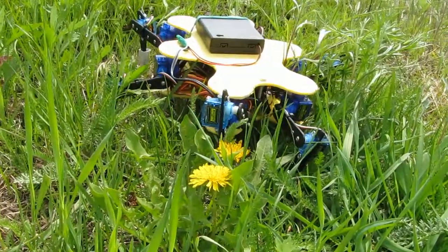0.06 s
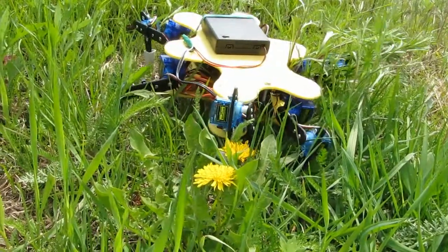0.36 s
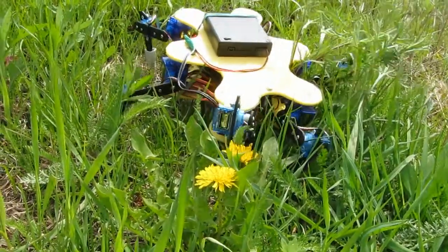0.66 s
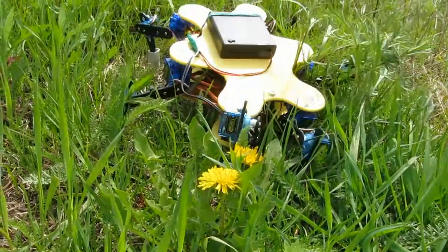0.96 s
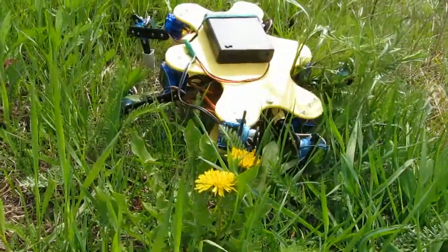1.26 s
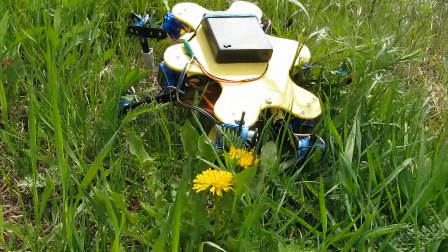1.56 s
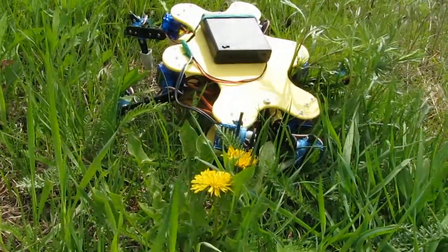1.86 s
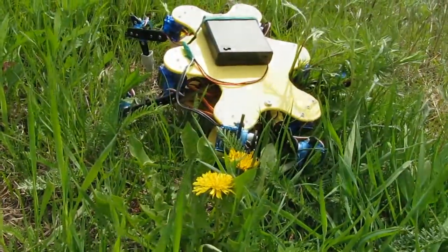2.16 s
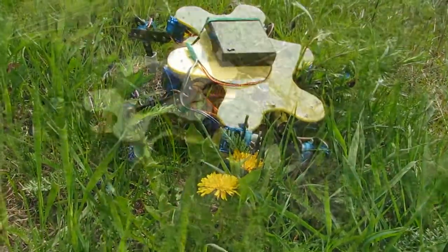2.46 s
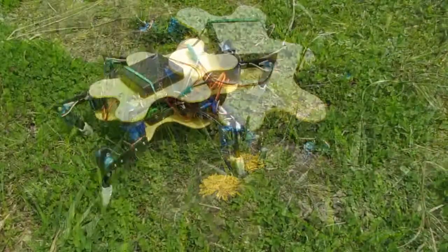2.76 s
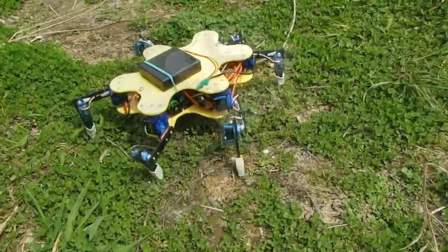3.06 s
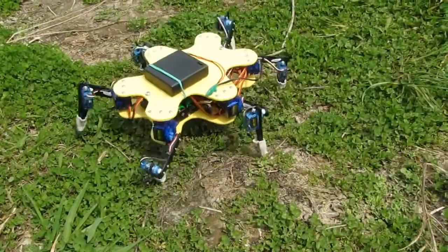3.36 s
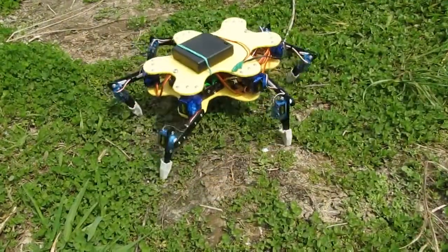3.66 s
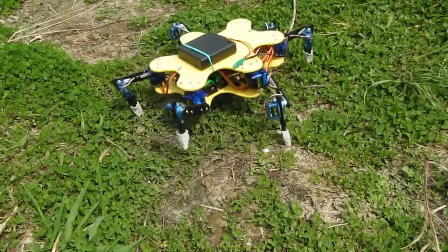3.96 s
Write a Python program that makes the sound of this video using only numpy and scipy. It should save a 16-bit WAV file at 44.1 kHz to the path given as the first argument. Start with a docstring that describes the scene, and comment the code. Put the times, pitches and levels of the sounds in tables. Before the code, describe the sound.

A small walking robot rustles in grass close by, with sharp plastic snaps at the start, at 0.6 seconds and around 1 to 1.2. Wind buffets the microphone from 0.2 until about 3.2 seconds. At 2.1 seconds the servos suddenly start a hissing whirr that swells with each stride to the end, with brief foot scuffs and loud snaps at 2.5 and 3.5 seconds, over soft outdoor hiss.

```python
"""Outdoors on grass, a camera's stereo microphone close to a small six-legged robot.
First the legs rustle through long blades and snap sharply against the plastic frame, while wind
starts to buffet the microphone, mostly the right port. At 2.1 s the servos start all at once,
a hissing whirr of tiny gears that swells with every stride. Just after 3 s the wind drops away
and the robot walks on over a soft background hiss."""
import sys
import numpy as np
from scipy import signal
from scipy.fft import rfft, irfft, next_fast_len
from scipy.io import wavfile
from scipy.ndimage import uniform_filter1d, map_coordinates

SR = 44100
rng = np.random.default_rng(int(sys.argv[2]) if len(sys.argv) > 2 else 0)


def transcribe(signal):
    """Save signal, clipped to [-1, 1], as a 16-bit WAV file at the path in sys.argv[1]."""
    frames = np.atleast_2d(signal).T
    limited = np.clip(frames, -1, 1)
    pcm = np.round(limited * 32767).astype(np.int16)
    wavfile.write(sys.argv[1], SR, pcm)


N = 176400

# Servo strokes, close up: t/s at top speed, length/s, relative hiss level/dB, relative rasp level/dB
STROKES = [(2.149, 0.091, -30, -39), (2.285, .14, -25.5, -35), (2.493, 0.11, -26.5, -36),
           (2.602, .08, -37, -48), (2.804, 0.15, -28, -37.5), (3.023, 0.099, -25, -32.5),
           (3.095, 0.057, -30, -36), (3.287, 0.18, -27.5, -39), (3.484, .05, -28, -37.5),
           (3.551, 0.098, -36, -51), (3.775, .14, -29.5, -40.5), (3.868, 0.052, -30, -38.5),
           (3.995, 0.098, -27, -33)]
# Colour of the gear hiss and of the lower gearbox rasp: f/Hz, level/dB
HISS_SPECTRUM = [(500, -66), (3000, -21.5), (4200, -8.5), (5800, -4), (6750, -3), (7300, 1.5), (7900, -5),
                 (10000, -8), (14200, -11), (16000, -21)]
RASP_SPECTRUM = [(300, -24), (1700, -11), (2050, 1.5), (2380, -5), (2650, 4.5), (2950, -5), (3380, 2.5),
                 (3800, -4), (4200, -3), (4900, -16), (6500, -45)]
# The robot's stereo image at the microphone: f/Hz, left-right likeness (0-1)
ROBOT_LIKENESS = [(1000, 1), (5000, 0.64), (8000, 0.58), (14000, 0.1)]
SERVO_START_S, SERVO_ATTACK_S = 2.109, 0.00079
HISS_GAIN_DB, RASP_GAIN_DB, HISS_FLOOR_DB, RASP_FLOOR_DB = 1, 2, -44, -51
TEETH_PER_S, TEETH_PER_S_PER_DB, FULL_EFFORT_DB = 275, 5, -26  # teeth click faster as the effort rises
# Motor whines as a leg turns back: centre t/s, length/s, level/dB, f/Hz
WHINES = [(2.708, 0.034, -35, 8720), (3.123, 0.073, -39, 10000), (3.623, .025, -38, 8700)]
# Tones of the powered servos: f/Hz, level/dB relative to the background hiss, waver (share of f)
IDLE_TONES = [(1390, -15, .028), (2617, -15, .004)]
# Ticking of the loaded servos: t/s, level/dB
TWITCH_LEVEL = [(.08, -67), (.14, -48), (.3, -48.5), (.36, -59), (.53, -55), (.68, -59), (.9, -86)]

# Legs snapping on the frame: t/s, crack level/dB, ring level/dB, crack f/Hz
SNAPS = [(.0069, -5, -26.5, 6980), (.048, -34, -47, 6800), (0.6037, -9.5, -25, 7280),
         (0.9644, -16, -20, 6400), (1.016, -39, -40, 7600), (1.1043, -18.5, -17.5, 6440),
         (1.2337, -11, -18.5, 6450), (1.266, -35, -33, 6600), (2.55, 0.5, -41, 7890),
         (3.5013, -1.5, -32, 8360)]
# Colour of a crack: multiple of its f, level/dB
CRACK_SPECTRUM = [(.06, -32), (.4, -9), (.6, -12), (.95, -1), (1.3, -4), (1.65, -1.5), (2.3, -12)]
# Modes of the plastic frame: f/Hz, level/dB, t60/s
FRAME_MODES = [(1040, 0, .017), (1500, -5, .02), (2110, -3, .017), (2520, 0, .013), (2800, -9, .01),
               (6250, -2, .007)]
CRACK_T60_S, PING_T60_S, PING_DB, SCATTER_T60_S, SCATTER_DB = 0.0033, 0.0023, 7, 0.03, -19.5
# Feet scuffing the turf: centre t/s, length/s, level/dB, f/Hz
SCUFFS = [(0.037, 0.017, -38, 7200), (0.627, 0.025, -42.5, 7500), (1.12, 0.06, -40, 6350),
          (2.116, 0.01, -25, 6960), (2.365, 0.063, -30, 6500), (2.709, 0.029, -31, 7900),
          (3.142, 0.095, -31, 8000), (3.41, 0.18, -34.5, 6700), (3.623, 0.048, -34, 7700)]
# Colour of a scuff: multiple of its f, level/dB
SCUFF_SPECTRUM = [(.2, -18.5), (.55, -8.5), (.9, -3.5), (1.1, -4), (1.6, -14), (2.2, -35)]
# Legs brushing the grass: t/s, level/dB
GRASS_LEVEL = [(0, -44), (.08, -49), (.3, -43.5), (.5, -43.5), (.62, -49), (.69, -53.5), (.85, -50),
               (1.0, -40.5), (1.2, -44.5), (1.26, -37), (1.3, -49.5), (2.1, -56)]
# Colour of the blades: f/Hz, level/dB
GRASS_SPECTRUM = [(500, -1.5), (1500, -6), (3500, 1), (5000, -4), (6500, -3.5), (9000, -9.5),
                  (11000, -15.5), (16000, -22)]

# Gusts on the microphone, and the breeze between them: start t/s, length/s, relative level/dB
GUSTS = [(.239, 0.035, -17), (.3, 0.055, -25.5), (.468, 0.079, -8), (.565, 0.039, -14), (.625, 0.059, -8),
         (.69, 0.081, -15), (.845, 0.13, -18), (.988, 0.081, -14), (1.08, 0.16, -20.5), (1.245, 0.017, -12),
         (1.27, 0.17, -26.5), (1.495, 0.061, -20.5), (1.668, 0.058, -17), (1.75, .055, -26.5),
         (1.95, 0.066, -14), (2.02, 0.074, -12), (2.11, 0.043, -18), (2.365, 0.077, -14.5),
         (2.46, 0.072, -19.5), (2.595, .04, -29), (2.745, 0.051, -26), (2.88, 0.22, -28.5),
         (3.158, 0.013, -17)]
BREEZE = (0.198, 2.95, -34.5)
# Wind direction: t/s, level/dB at the left port relative to the right
WIND_SIDE = [(.49, -17), (.54, -2), (.68, -6), (1.0, -16), (1.85, -15), (1.98, -27), (2.12, -9),
             (2.42, -22), (2.65, -12)]
# Colour of the low eddies and the higher flutter at the ports: f/Hz, level/dB
EDDY_SPECTRUM = [(15, -8.5), (38, -0.5), (70, 0.5), (125, -4), (400, -34), (1200, -100)]
FLUTTER_SPECTRUM = [(60, -31), (140, 5), (250, 1), (400, -16), (1400, -37.5), (4000, -80)]
GUST_EDGE_S, STRONG_GUST_DB, EDDY_DB, FLUTTER_DB, FLUTTER_EXPONENT = 0.0051, -11.5, 1.5, -8.5, 1.61
# Colour of the background hiss and of the low outdoor rumble: f/Hz, level/dB
BACKGROUND_SPECTRUM = [(20, -5), (80, 11.5), (280, 4), (460, -0.5), (1200, 4), (1480, 5.5), (1700, -.5),
                       (2600, 3), (3700, 5), (4400, -3), (9000, -10.5), (16000, -17.5)]
RUMBLE_SPECTRUM = [(30, -16), (41, 1), (49, -18.5), (100, -18), (250, -76)]
# Background hiss, rising and falling with the camera's gain: t/s, level/dB
BACKGROUND_LEVEL = [(0, -55), (1.1, -54), (1.6, -46.5), (3.15, -41), (3.3, -48)]
# Low outdoor rumble: t/s, level/dB
RUMBLE_LEVEL = [(0, -42.5), (3.35, -41.5), (3.55, -60.5), (4, -50)]


def servos():
    """Close up, gear teeth click through the servo cases, faster and louder in mid-stroke."""
    hiss_power = sum((amp(db) * swell(s, length)) ** 2 for s, length, db, _ in STROKES)
    rasp_power = sum((amp(db) * swell(s, length)) ** 2 for s, length, _, db in STROKES)
    hiss_gain = np.sqrt(amp(HISS_FLOOR_DB) ** 2 + hiss_power)
    rasp_gain = np.sqrt(amp(RASP_FLOOR_DB) ** 2 + rasp_power)
    effort_db = 20 * np.log10(hiss_gain) - FULL_EFFORT_DB
    tooth_rate = np.maximum(TEETH_PER_S + TEETH_PER_S_PER_DB * effort_db, 20)
    teeth = chatter(tooth_rate, jitter=.09, life_s=.00045, spread_db=1.9, share=.62)
    hiss = amp(HISS_GAIN_DB) * hiss_gain * servo_cases(rush(HISS_SPECTRUM, ROBOT_LIKENESS))
    rasp = amp(RASP_GAIN_DB) * rasp_gain * servo_cases(rush(RASP_SPECTRUM, ROBOT_LIKENESS))
    running = np.clip((np.arange(N) / SR - SERVO_START_S) / SERVO_ATTACK_S, 0, 1)
    pan = amp([[.25], [-.25]])  # a touch left of centre
    return running * teeth * (hiss + rasp) * pan


def servo_cases(x, ripple_db=2.5):
    """Different cases ring as the legs turn: narrow resonances that shift at random."""
    spectra = signal.stft(x, nperseg=512)[2]
    ripple = uniform_filter1d(rng.standard_normal(spectra.shape[1:]), size=3, axis=0)  # over frequency
    ripple = uniform_filter1d(ripple, size=16, axis=1)  # over time
    coloured = signal.istft(spectra * amp(ripple_db * unit(ripple)), nperseg=512)[1]
    return unit(coloured[:, :N])


def motor_whines():
    """Thin motor tones: faint ones throughout, and a short high one where a leg turns back."""
    background_db = curve(BACKGROUND_LEVEL)
    idle = sum(amp(background_db + db) * tone(hz, waver) for hz, db, waver in IDLE_TONES)
    return idle + sum(amp(db) * swell(s, length) * tone(hz, waver=.016) for s, length, db, hz in WHINES)


def servo_twitches():
    """Servos holding against the grass tick faintly, once per control pulse."""
    ticks = chatter(per_s=50, jitter=.04, life_s=.00033, spread_db=5.5, share=1)
    return amp(curve(TWITCH_LEVEL)) * ticks * rush(HISS_SPECTRUM, ROBOT_LIKENESS)


def leg_snaps():
    """A leg hits the frame: a crack with a brief ping, a dull ring and faint scatter off the ground."""
    out = np.zeros((2, N + SR))
    t = np.arange(SR // 10) / SR
    rise = 1 - np.exp(-t / .00008)
    envelope = decay(t, CRACK_T60_S) + amp(SCATTER_DB) * decay(t, SCATTER_T60_S)
    for s, crack_db, ring_db, hz in SNAPS:
        at = round(s * SR)
        noise = pitched_rush(CRACK_SPECTRUM, hz)[:, :len(t)]
        crack = unit(noise * envelope) * np.sqrt(np.mean(envelope ** 2))
        ping = amp(PING_DB) * np.sin(2 * np.pi * hz * t) * decay(t, PING_T60_S)
        out[:, at:at + len(t)] += rise * (amp(crack_db) * (crack + ping) + amp(ring_db) * frame_ring(t))
    return out[:, :N]


def frame_ring(t, spread_db=1.8, detune=.02):
    """Each snap lands on a different part of the plastic frame, so its modes vary in level and pitch."""
    ring = np.zeros(len(t))
    for k, (hz, db, t60) in enumerate(FRAME_MODES):
        gain = (-1) ** (k + 1) * amp(db + rng.normal(0, spread_db))
        ring += gain * np.sin(2 * np.pi * hz * rng.normal(1, detune) * t) * decay(t, t60)
    return ring


def foot_scuffs():
    """A foot slides over the turf with a short bright swish."""
    return sum(amp(db) * swell(s, length) * pitched_rush(SCUFF_SPECTRUM, hz)
               for s, length, db, hz in SCUFFS)


def grass():
    """Near the microphone, long blades flick and scrape along the legs."""
    flicks = chatter(per_s=170, jitter=1.7, life_s=.00025, spread_db=3.2, share=.48)
    return amp(curve(GRASS_LEVEL)) * flicks * rush(GRASS_SPECTRUM, likeness=[(3000, 0.64)])


def wind():
    """Eddies thump each microphone port on its own; strong gusts add flutter and overload it softly."""
    t = np.arange(N) / SR
    edge = lambda s: .5 + .5 * np.tanh((t - s) / GUST_EDGE_S)
    power = sum(amp(db) ** 2 * edge(s) * (1 - edge(s + length)) for s, length, db in [*GUSTS, BREEZE])
    right = np.sqrt(power)
    gust = np.array([right * amp(curve(WIND_SIDE)), right])
    lumps = unit(amp(3.5 * np.array([wobble(70), wobble(70)])))
    eddies = rush(EDDY_SPECTRUM, likeness=[(100, 0.068)])
    eddy_power = np.abs(uniform_filter1d(eddies ** 2, size=1900, axis=1))
    eddies /= np.sqrt(eddy_power + 1e-9)  # evened out, so the gusts set the level
    flutter_gain = amp(STRONG_GUST_DB + FLUTTER_DB) * (gust / amp(STRONG_GUST_DB)) ** FLUTTER_EXPONENT
    flutter = flutter_gain * rush(FLUTTER_SPECTRUM, likeness=[(200, 0.088)])
    return np.tanh(amp(EDDY_DB) * gust * eddies + lumps * flutter)


def background():
    """A soft hiss that rises and falls with the camera's gain, over a low outdoor rumble."""
    hiss = rush(BACKGROUND_SPECTRUM, likeness=[(100, 0.69), (1500, 0.79), (8000, 0.21)])
    rumble = rush(RUMBLE_SPECTRUM, likeness=[(40, 0.97)])
    return amp(curve(BACKGROUND_LEVEL)) * hiss + amp(curve(RUMBLE_LEVEL)) * rumble


def chatter(per_s, jitter, life_s, spread_db, share):
    """Envelope of rms 1: tiny uneven contacts carry a share of the power, the rest is smooth."""
    count = np.cumsum(np.broadcast_to(per_s, N)) / SR
    timing, force = rng.standard_normal((2000, 2)).T
    at = np.searchsorted(count, np.arange(len(timing)) + jitter * timing)
    inside = at < N
    hits = np.bincount(at[inside], amp(spread_db * np.minimum(force[inside], 2)) ** 2, N)
    pole = np.exp(-1 / (life_s * SR))
    power = signal.lfilter([1], np.poly([pole, pole]), hits)  # each contact dies within a few life_s
    return np.sqrt(1 - share + share * power / power.mean())


def rush(spectrum, likeness):
    """Stereo noise of rms 1 with a given colour and left-right likeness over frequency."""
    def response(hz):
        angle = np.arccos(np.clip(along(likeness, hz), -1, 1)) / 2
        return amp(along(spectrum, hz)) * [np.cos(angle), np.sin(angle)]
    mid, side = filtered(rng.standard_normal((2, N)), response)
    return unit(np.array([mid + side, mid - side]))


def pitched_rush(spectrum, hz):
    """Noise from the robot's position, its colour given in multiples of hz."""
    return rush([(multiple * hz, db) for multiple, db in spectrum], ROBOT_LIKENESS)


def tone(hz, waver):
    """A sine of rms 1 whose pitch trembles by the share waver."""
    pitch = hz * (1 + waver * wobble(900))
    return unit(np.sin(2 * np.pi * np.cumsum(pitch) / SR))


def swell(s, length, squareness=2.4):
    """A rounded rise and fall around time s."""
    return np.exp(-.5 * np.abs(2 * (np.arange(N) / SR - s) / length) ** squareness)


def decay(t, t60):
    """A fall of 60 dB every t60 seconds."""
    return amp(-60 * t / t60)


def wobble(rate):
    """A smooth random curve, rate knots a second."""
    knots = rng.standard_normal(int(N * rate / SR) + 4)
    return map_coordinates(knots, [np.arange(N) * rate / SR])


def curve(points):
    """(t/s, value) points read at every sample."""
    return np.interp(np.arange(N) / SR, *np.transpose(points))


def along(points, hz):
    """(f/Hz, value) points read on a log axis."""
    f, values = np.transpose(points)
    return np.interp(np.log(hz + 1), np.log(f + 1), values)


def filtered(x, response):
    """x through a frequency response."""
    size = next_fast_len(N + SR // 2)
    return irfft(rfft(x, size) * response(np.fft.rfftfreq(size, 1 / SR)), size)[..., :N]


def amp(db):
    """Decibels to gain."""
    return 10 ** (np.asarray(db) / 20)


def unit(x):
    """Scale to rms 1."""
    return x / np.sqrt(np.mean(x ** 2) + 1e-20)


def scene():
    """The robot in the grass close by, wind on the microphone, hiss and rumble behind."""
    robot = servos() + motor_whines() + servo_twitches() + foot_scuffs() + leg_snaps()
    return robot + grass() + wind() + background()


def record(dry):
    """The camera clips at full scale and keeps nothing above 16 kHz."""
    return filtered(np.clip(dry, -1, 1), lambda hz: hz < 16000)


dry = scene()
out = record(dry)
transcribe(out)
```